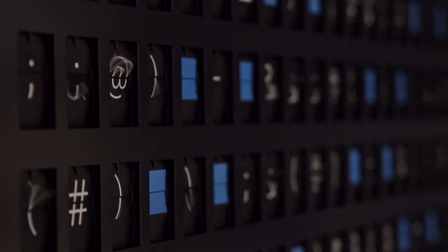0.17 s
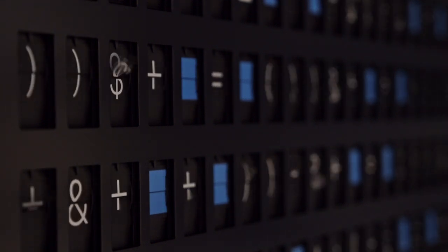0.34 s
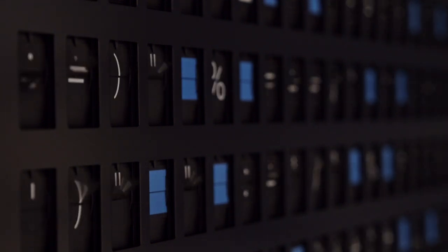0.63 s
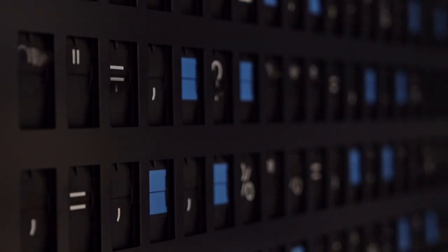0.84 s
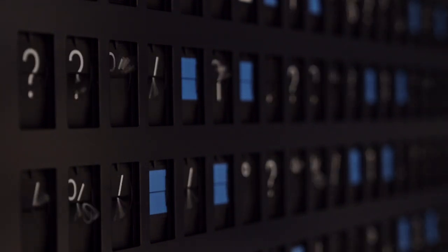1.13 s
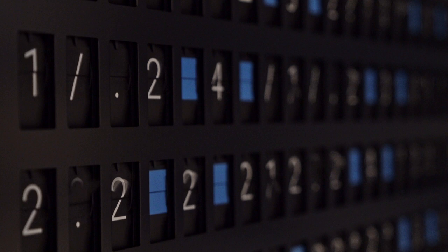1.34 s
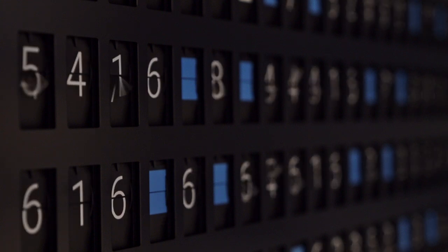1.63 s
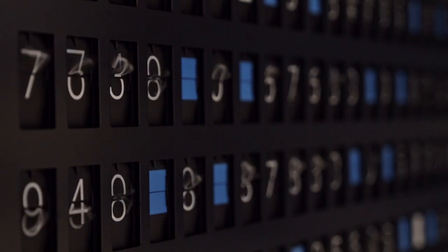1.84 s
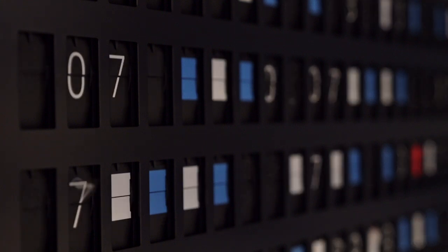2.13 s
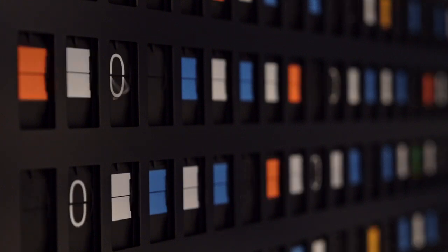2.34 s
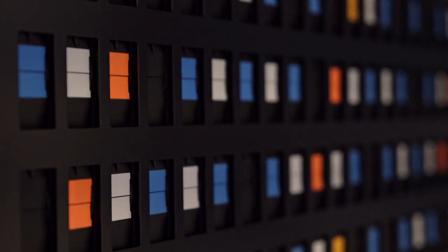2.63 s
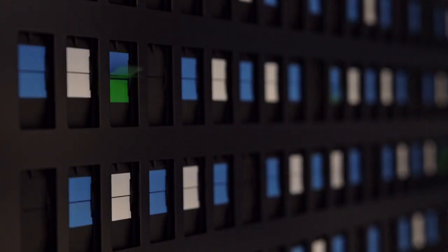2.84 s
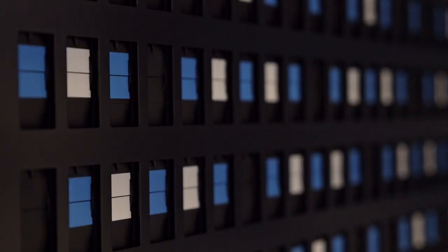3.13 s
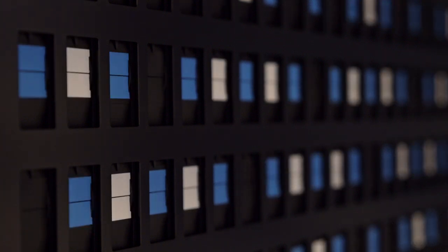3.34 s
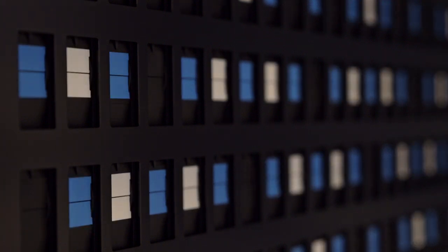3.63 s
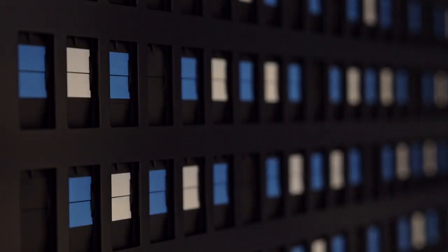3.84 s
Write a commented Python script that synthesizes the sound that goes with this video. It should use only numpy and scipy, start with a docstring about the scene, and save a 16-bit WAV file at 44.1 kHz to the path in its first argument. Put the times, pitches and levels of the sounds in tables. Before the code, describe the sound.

Many small plastic flaps flip rapidly on a wall board, rattling in beats before falling silent

```python
"""Split-flap board

A wall of split-flap modules riffles in a small room, close to a stereo microphone, over hiss and rumble.
Flaps snap off their catches with bright ticks, then slap onto the stack and ring the housing: noise cracks
with a short ring, each with a bounce. The modules step nearly together, drift apart and bunch again, thin
out and stop, leaving only room tone. Ticks and slaps draw their module spreads independently."""
import sys
import numpy as np
from scipy import signal
from scipy.io import wavfile

SR = 44100
rng = np.random.default_rng(int(sys.argv[2]) if len(sys.argv) > 2 else 0)


def pcm_store(signal):
    """Save signal as 16-bit PCM."""
    levels = np.round(np.clip(np.atleast_2d(signal), -1, 1) * 32767)
    wavfile.write(sys.argv[1], SR, levels.astype(np.int16).T)


N = 176400

# Common beat: step_s, lateness_s, module_scatter_s (ticks), tick_to_slap_s
BEAT = [(0, 0.013, 0.016, 0.03), (.5, 0.02, .019, 0.024), (.9, 0.02, 0.021, 0.026),
        (1.3, 0.021, .024, 0.024), (1.7, .034, .021, 0.023), (2.05, 0.032, 0.015, 0.022),
        (2.33, 0.024, .015, 0.018), (2.5, .018, .017, .013), (2.7, -0.0041, 0.016, .009),
        (2.8, -0.012, 0.011, 0.0069), (2.88, -0.028, .01, 0.0069)]
# Modules turning: time_s, share_0_to_1, tick_db, slap_db
TURNING = [(0, 0.97, 1, 0), (.6, 1, 0.5, -0.5), (1.3, 0.99, 0.5, 0.5), (1.85, 0.95, 1, 1),
           (2.02, 0.87, 1, 0), (2.12, 0.67, 0, -0.5), (2.27, 0.8, 0, -1), (2.36, 0.52, -2, -1),
           (2.5, .45, -1, -2), (2.65, .37, -2.5, -2.5), (2.8, 0.28, -1, -2), (2.87, 0.24, -11, -7.5)]
# Tick spectrum: freq_hz, gain_db
TICK_COLOUR = [(100, -44), (500, 1), (1000, -5), (1550, -1), (1900, 0.5), (2230, 2.5), (2600, -1),
               (3100, -3.5), (5000, -3), (7400, -3.5), (8300, -5.5), (9800, -6), (13000, -9),
               (16000, -17.5)]
# Slap spectrum before housing resonances: freq_hz, gain_db
SLAP_COLOUR = [(30, -28), (70, -13.5), (120, -14.5), (180, -10.5), (300, -10.5), (480, -4.5), (620, -3.5),
               (780, -2.5), (1200, -2), (1700, -9.5), (4000, -11), (16000, -25.5)]
# Flap and housing resonances: centre_hz, width_hz, lift_db
HOUSING = [(220.4, 29, 4.5), (380, 23.5, 11.5), (456, 24, 3), (512, 25, 4), (916, 112, 6), (1019, 90, 3.5)]
# Stereo width of the board: freq_hz, side_vs_mid_db
BOARD_WIDTH = [(60, -46), (130, -41), (290, -17), (640, -10), (1410, -5), (3100, 0), (6820, -0.5),
               (15000, -1.5)]
# Microphone imbalance: freq_hz, left_minus_right_db
LEAN = [(500, 1), (1000, 1.4), (3000, 0.5), (4500, 1.5), (7000, -2), (9000, -2.5), (12000, 1), (16000, 1.5)]
# Room decay: freq_hz, t60_s
ROOM_DECAY = [(150, 0.44), (500, 0.39), (1150, 0.39), (3000, 0.34), (7000, 0.32), (14000, 0.23)]
# Room tone spectral density, relative: freq_hz, density_db
AIR_COLOUR = [(25, -1), (45, -4.5), (78, 4), (130, 1), (200, -6), (300, -11.5), (600, -15.5), (1000, -14.5),
              (1500, -18), (2200, -23.5), (4500, -26.5), (15500, -30.5)]
# Stereo width of the room tone: freq_hz, side_vs_mid_db
AIR_WIDTH = [(60, -43), (180, -13.5), (550, -1.5), (1650, 0), (4970, 1), (15000, -2)]
# Rumble gain: time_s, gain_db
RUMBLE = [(2.9, 2.5), (3.129, 1), (3.35, -1.5), (3.6, -2), (4, -1)]

FILTER_TAPS = 8192
HZ = np.fft.rfftfreq(FILTER_TAPS, 1 / SR)
STEP_S, JITTER_S, SLAP_SCATTER_RATIO, PAN_SD = .08, .003, .85, 0.39
BOUNCE_MEDIAN_S, BOUNCE_DB = .006, -7.5
TICK_DB, TICK_SPREAD_DB, TICK_ROOM_DB = -23.5, 3, -1.5
TICK_T60_S, TICK_RISE_S = 0.012, 0.00074
TICK_RING_HZ, TICK_RING_SD_OCTAVES, TICK_RING_POWER_SHARE = 4516, .8, 0.22
SLAP_DB, SLAP_SPREAD_DB, SLAP_ROOM_DB = -26, 5, -1
SLAP_T60_S, SLAP_RISE_S = .012, 0.00071
SLAP_RING_HZ, SLAP_RING_SD_OCTAVES, SLAP_RING_POWER_SHARE = 906, 0.59, 0.0086
RING_T60_S = 0.02
AIR_DB, RUMBLE_TOP_HZ = -53, 201.6
CENTRED_HZ, LOW_CUT_HZ, EDGE_HZ = 200, 18, 15750


def amp(db):
    """Decibels to gain."""
    return 10 ** (np.asarray(db) / 20)


def read(points, hz=HZ):
    """Table interpolated on a log-frequency axis."""
    f, value = np.transpose(points)
    return np.interp(np.log(hz + 1), np.log(f + 1), value)


def at_time(points, s):
    """All value columns of a table, interpolated at time s."""
    times, *columns = np.transpose(points)
    return [np.interp(s, times, column) for column in columns]


def add(mix, s, sound):
    """Add a two-channel sound at time s; skip it if it starts before zero."""
    start = round(s * SR)
    if start >= 0:
        part = mix[:, start:start + sound.shape[1]]
        part += sound[:, :part.shape[1]]


def colour(x, db):
    """Causal minimum-phase filter with the given gain over HZ."""
    log_gain = np.log(amp(np.r_[db, db[-2:0:-1]]))
    taps = np.fft.ifft(np.exp(np.conj(signal.hilbert(log_gain)))).real
    return signal.oaconvolve(x, taps[:FILTER_TAPS // 2])[:N]


def voiced(pair, db, level_db):
    """Colour a mid-side pair and set the RMS of its mid."""
    out = np.array([colour(x, db) for x in pair])
    return amp(level_db) * out / out[0].std()


def stereo(pair, width):
    """Mid-side to left-right, with frequency-dependent width."""
    side = colour(pair[1], read(width))
    return np.array([pair[0] + side, pair[0] - side])


def knocks(t60_s, rise_s, ring_hz, sd_octaves, power_share, count=1500, size=800):
    """Stock of mid-side impacts: a short noise crack plus a brief plastic ring at its own pitch."""
    t = np.arange(size) / SR
    share = np.clip(power_share, 0, 1)
    rise = 1 - np.exp(-t / rise_s)
    crack = rise * np.exp(-np.log(1000) * t / t60_s)
    ring = rise * np.exp(-np.log(1000) * t / RING_T60_S)
    hz = ring_hz * 2 ** (sd_octaves * rng.standard_normal((count, 1, 1)))
    hz = np.minimum(hz, SR / 2)
    phase = rng.random((count, 2, 1))  # cycles
    tone = np.sqrt(2) * np.sin(2 * np.pi * (hz * t + phase))
    noise = rng.standard_normal((count, 2, size))
    cracks = noise * crack / np.linalg.norm(crack)
    rings = tone * ring / np.linalg.norm(ring)
    return np.sqrt(1 - share) * cracks + np.sqrt(share) * rings


def impacts(pool, spread_db, falls, scatter_ratio, count=180, groups=12):
    """Turning modules strike once a step, each with a bounce; one mid-side pair per group of modules."""
    out = np.zeros((groups, 2, N), np.float32)
    pan = np.clip(PAN_SD * rng.standard_normal((count, 1)), -1, 1)
    place = np.sort(rng.standard_normal(count * 20))[10::20]  # early or late in the beat
    golden = (np.sqrt(5) - 1) / 2
    rank = (np.arange(count) * golden + rng.random()) % 1  # highest rank stops first
    for step_s in np.arange(0, TURNING[-1][0] + STEP_S / 2, STEP_S):
        late_s, scatter_s, fall_s = at_time(BEAT, step_s)
        share, tick_db, slap_db = at_time(TURNING, step_s + late_s)
        jitter, force, rebound = rng.standard_normal((count, 3)).T
        hits = pool[rng.integers(0, len(pool), count)]
        hits[:, 1] = pan * hits[:, 0] + np.sqrt(1 - pan ** 2) * hits[:, 1]
        spread_s = scatter_ratio * scatter_s * place + JITTER_S * jitter
        times_s = step_s + late_s + falls * fall_s + spread_s
        bounces_s = times_s + BOUNCE_MEDIAN_S * np.exp(rebound / 2)
        force_db = spread_db * 2 * np.tanh(force / 2)  # soft-limited
        turning = np.clip((share - rank) * count, 0, 1)
        gains = turning * amp(force_db + (slap_db if falls else tick_db))
        for k in np.flatnonzero(gains):
            hit = gains[k] * hits[k]
            add(out[k % groups], times_s[k], hit)
            add(out[k % groups], bounces_s[k], amp(BOUNCE_DB) * hit)
    return out


def room(groups, wet_db, size=16000):
    """Short diffuse tail per group: noise whose treble dies first."""
    noise = rng.standard_normal((len(groups), 2, size))
    hz, t, z = signal.stft(noise, SR, nperseg=256)
    decay = np.exp(-np.log(1000) * t / read(ROOM_DECAY, hz)[:, None])
    tails = signal.istft(z * decay, SR, nperseg=256)[1]
    tails /= np.linalg.norm(tails, axis=2, keepdims=True)
    wet = signal.fftconvolve(groups, tails.astype(np.float32), axes=2).sum(0)[:, :N]
    return groups.sum(0) + amp(wet_db) * wet


def ticks():
    """Flaps snapping off their catches: bright cracks and rings."""
    pool = knocks(TICK_T60_S, TICK_RISE_S, TICK_RING_HZ, TICK_RING_SD_OCTAVES, TICK_RING_POWER_SHARE)
    hits = impacts(pool, TICK_SPREAD_DB, False, 1)
    return voiced(room(hits, TICK_ROOM_DB), read(TICK_COLOUR), TICK_DB)


def slaps():
    """Flaps landing on the stack, lifted at the housing resonances."""
    body_db = read(SLAP_COLOUR)
    for hz, width_hz, lift_db in HOUSING:
        body_db = body_db + lift_db / (1 + (2 * (HZ - hz) / width_hz) ** 2)
    pool = knocks(SLAP_T60_S, SLAP_RISE_S, SLAP_RING_HZ, SLAP_RING_SD_OCTAVES, SLAP_RING_POWER_SHARE)
    hits = impacts(pool, SLAP_SPREAD_DB, True, SLAP_SCATTER_RATIO)
    return voiced(room(hits, SLAP_ROOM_DB), body_db, SLAP_DB)


def room_tone():
    """Coloured noise: faint hiss and a low rumble that eases late, then recovers slightly."""
    air = stereo(voiced(rng.standard_normal((2, N)), read(AIR_COLOUR), AIR_DB), AIR_WIDTH)
    low_pass = signal.butter(2, RUMBLE_TOP_HZ, fs=SR, output="sos")
    rumble = signal.sosfiltfilt(low_pass, air)
    rumble_db = at_time(RUMBLE, np.arange(N) / SR)[0]
    return air - rumble + rumble * amp(rumble_db)


def scene():
    """Board, coloured slightly differently at each microphone, over room tone."""
    left, right = stereo(ticks() + slaps(), BOARD_WIDTH)
    half_lean_db = read([(CENTRED_HZ, 0), *LEAN]) / 2
    board = np.array([colour(left, half_lean_db), colour(right, -half_lean_db)])
    return board + room_tone()


def record(dry):
    """Low cut, then a linear-phase band limit."""
    low_cut = signal.butter(2, LOW_CUT_HZ, "high", fs=SR, output="sos")
    band_limit = signal.firwin(801, EDGE_HZ, window=("kaiser", 9), fs=SR)
    return signal.oaconvolve(signal.sosfilt(low_cut, dry), band_limit[None], "same")


dry = scene()
out = record(dry)
pcm_store(out)
```